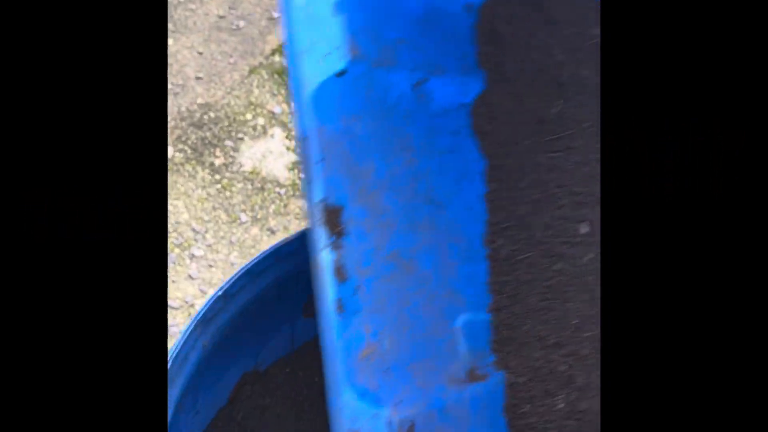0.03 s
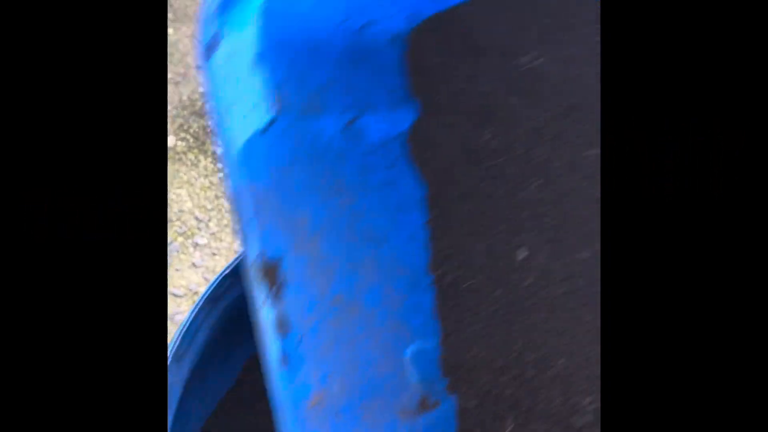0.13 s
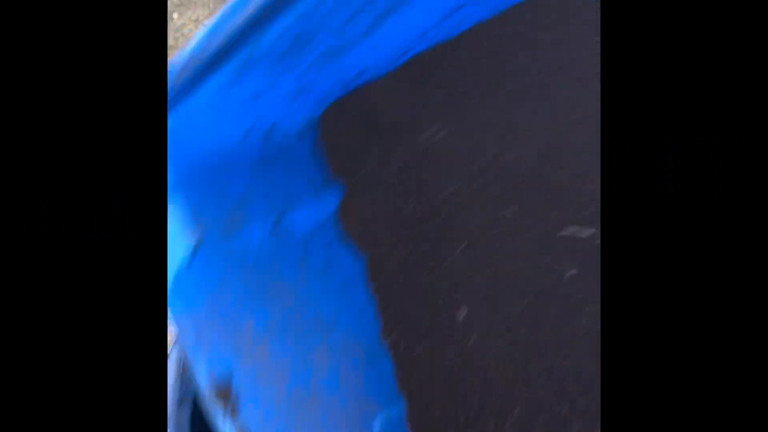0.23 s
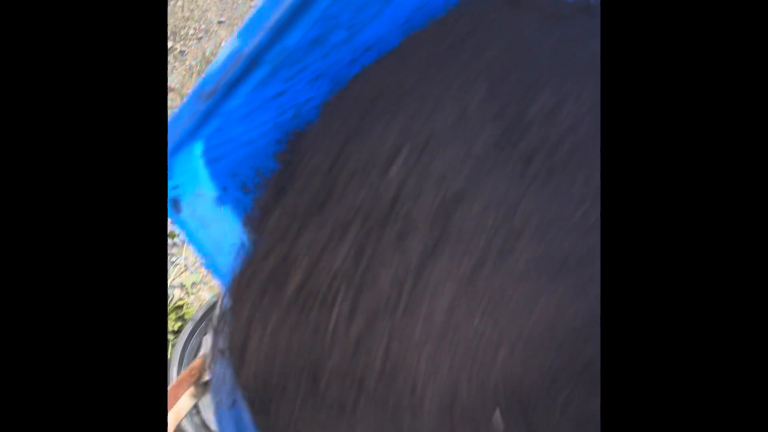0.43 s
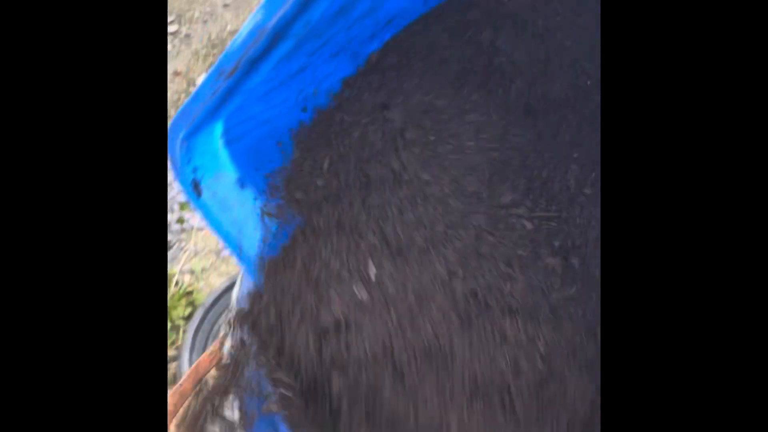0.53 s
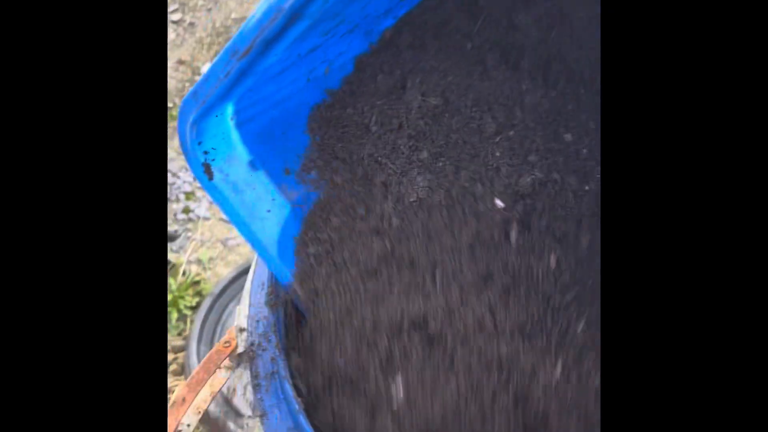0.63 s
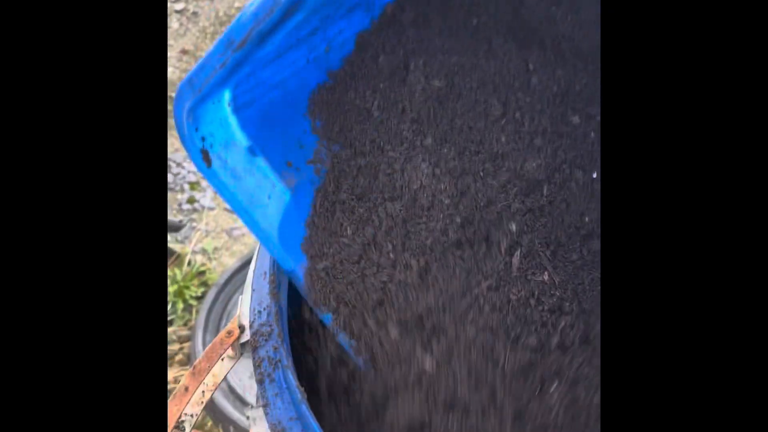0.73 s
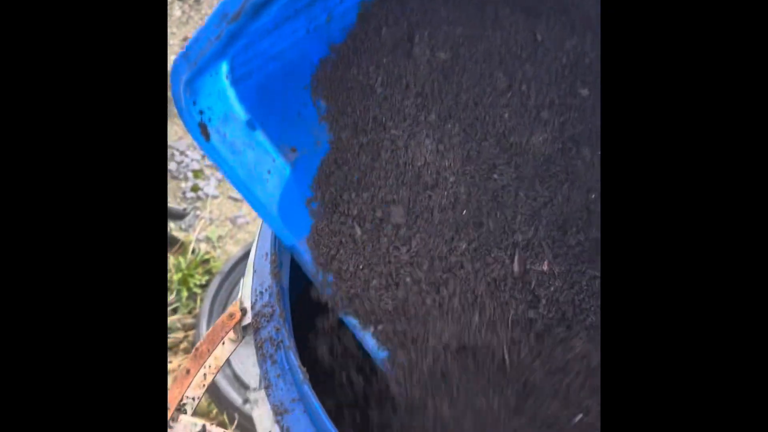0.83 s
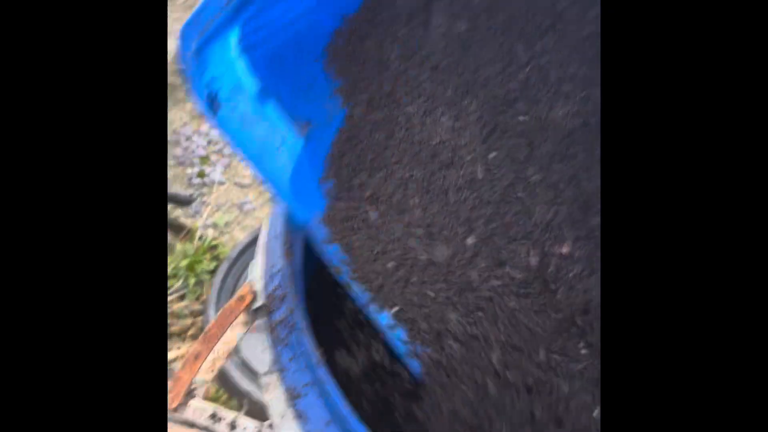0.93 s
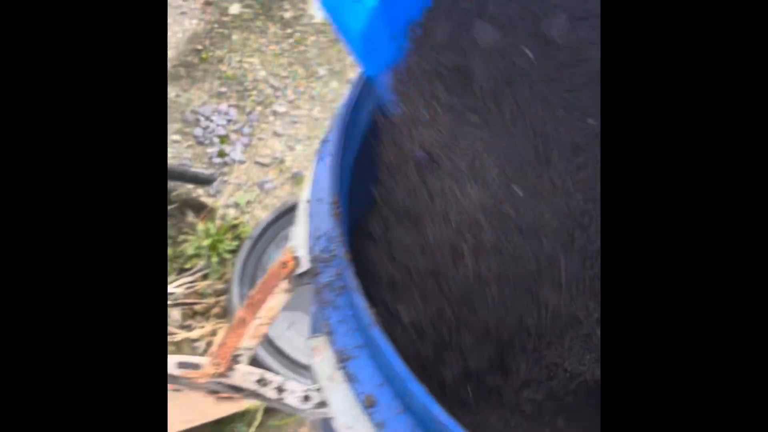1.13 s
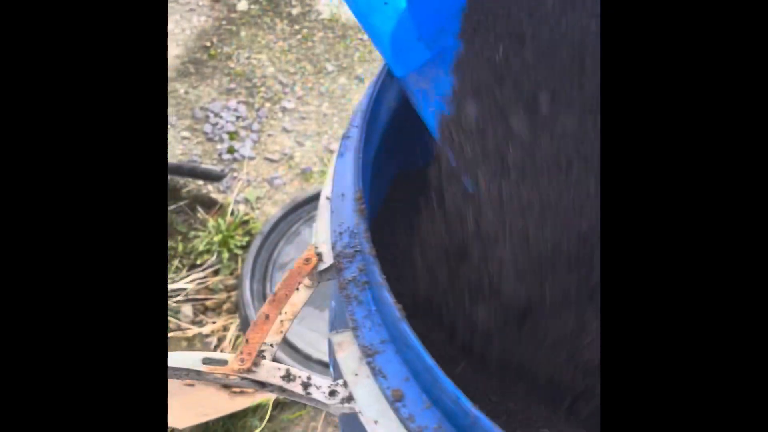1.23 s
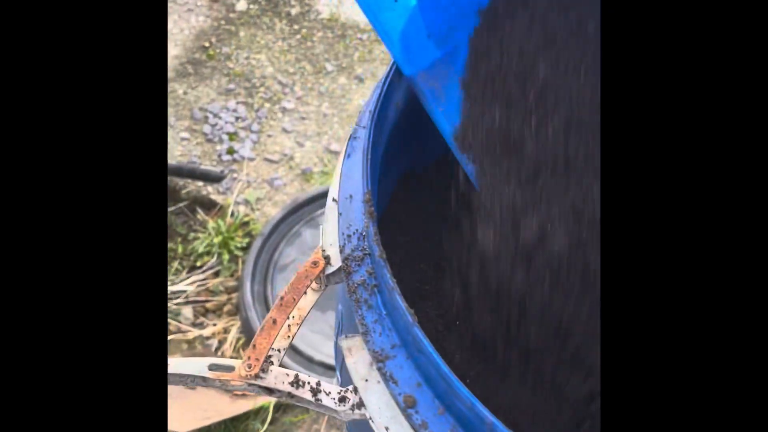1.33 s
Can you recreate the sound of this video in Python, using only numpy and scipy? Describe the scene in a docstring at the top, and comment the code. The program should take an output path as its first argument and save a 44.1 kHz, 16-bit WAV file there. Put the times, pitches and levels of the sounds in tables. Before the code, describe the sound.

Damp soil pours into a plastic barrel, close up outdoors. It starts with a soft sliding rustle. At about 0.25 seconds the plastic tub knocks loudly on the rim and a first load slumps in. Soil hisses over the edge around 0.6 seconds, with ticks of grit. From 0.9 seconds a second load lands with hollow thuds, thinning to trickling crumbs and a low rumble by 1.4 seconds.

```python
"""A plastic tub of damp soil is tipped over a plastic barrel, outdoors and close up.
First the soil creeps along the tub with a rustle of friction. At 0.24 s the tub knocks on the rim,
exciting its modes, and a first load slumps into the barrel, which booms at its resonances.
Soil then hisses over the lip, crumbs trickle, clods thud and bits of grit tick on the plastic.
At 0.93 s a second load booms, and the last clods and crumbs fall over the barrel's low murmur."""
import sys
import numpy as np
from scipy import signal
from scipy.fft import rfft, irfft, next_fast_len
from scipy.io import wavfile
from scipy.ndimage import map_coordinates

SR = 44100
rng = np.random.default_rng(int(sys.argv[2]) if len(sys.argv) > 2 else 0)


def master(y):
    """Save y as 16-bit WAV."""
    cut = np.clip(np.atleast_2d(y).T, -1, 1)
    pcm = np.round(cut * 32767)  # scale
    wavfile.write(sys.argv[1], SR, pcm.astype(np.int16))


N = 61739

# spectrum of crumbling soil: frequency_hz, density_db
CRUMBS = [(100, 13), (400, 7.5), (700, -9), (1000, -1), (1500, -4), (2400, -4), (3500, -13), (7000, -11.5),
          (9500, -14.5), (10700, -15.5), (11600, -51), (14000, -75)]
WALL_RISE_CYCLES = .88


def amp(db):
    """Amplitude ratio of a level in decibels."""
    return 10 ** (np.asarray(db) / 20)


def unit(x):
    """Normalisation to an rms of 1."""
    return x / np.sqrt(np.mean(x ** 2) + 1e-20)


def along(points, hz):
    """Interpolation of (frequency_hz, value) points on a logarithmic frequency axis."""
    frequencies, values = np.transpose(points)
    return np.interp(np.log(hz + 1), np.log(frequencies + 1), values)


def clock():
    """Time of each sample in seconds."""
    return np.arange(N) / SR


def envelope(rows):
    """Amplitude envelope through (time_s, level_db) points."""
    return amp(np.interp(clock(), *np.transpose(rows)))


def since(start_s):
    """Time elapsed since an onset, zero before it."""
    return np.maximum(clock() - start_s, 0)


def filtered(x, response):
    """Linear filtering: the spectrum of x is multiplied by a frequency response."""
    size = next_fast_len(N + SR // 2)
    return irfft(rfft(x, size) * response(np.fft.rfftfreq(size, 1 / SR)), size)[..., :N]


def coloured(x, spectrum):
    """Spectral shaping by (frequency_hz, gain_db) points, normalised to an rms of 1."""
    return unit(filtered(x, lambda hz: amp(along(spectrum, hz))))


def impacts(per_s, spread_db):
    """Shot noise: independent tiny impacts of uneven size, at an rms of 1."""
    strikes = rng.random(N) < per_s / SR
    size = amp(spread_db * np.clip(rng.standard_normal(N), -2.5, 2.5))
    polarity = rng.choice([-1, 1], N)
    return unit(strikes * polarity * size)


def clumps(per_s, depth_db):
    """Random amplitude modulation: a smoothly varying gain, as damp soil moves in clumps."""
    knots = rng.standard_normal(1024)
    return amp(depth_db * map_coordinates(knots, [clock() * per_s], mode="wrap"))


def ring(t, hz, t60_s, rise_cycles):
    """Free vibration of one mode: a sinusoid with a soft onset and exponential decay."""
    return np.sin(2 * np.pi * hz * t) * amp(-60 * t / t60_s) * (1 - np.exp(-t * hz / rise_cycles))


def knock():
    """Impact excites modes: the tub touches, hits and settles on the rim, with a snap and a crack."""
    # tub meeting the rim: start_s, thud_db, wall_db, focus_hz, crack_db, crack_t60_s, cutoff_hz
    contacts = [(.2394, -57.5, -21, 1920, -15.5, 0.0089, 5500),
                (0.2443, -6.5, -18.5, 960, -14.5, 0.079, 13900), (0.2586, -6, -28.5, 980, -44, 0.11, 5000)]
    # deep modes of the tub resting on the barrel: pitch_hz, level_db, t60_s, rise_cycles
    tub_modes = [(67.6, -10, 0.076, 0.58), (120, -1.5, 0.077, .9), (173, -3, 0.036, 0.82),
                 (283, 6, 0.053, 0.26), (500, -8, 0.04, .5), (534.6, -4.5, 0.035, 0.86),
                 (576, -6.5, 0.046, 0.71), (655, -20.5, 0.021, 0.44), (825, -17.5, 0.018, .4)]
    # modes of the thin tub wall: pitch_hz, level_db, t60_s
    wall_modes = [(805, 0, .05), (980, -8, .05), (1113, -4, .05), (1226, -4, .05), (1526, 0, .05),
                  (1733, -3, .055), (1858, -2, .055), (2355, -6, .04), (2695, -1, .05), (3965, -5, .04)]
    # spectrum of the gritty crack: frequency_hz, density_db
    crack_spectrum = [(200, -2), (700, 4.5), (1800, -3), (3300, -12.5), (3900, -5.5), (4500, -9.5),
                      (6000, -10), (8000, -9.5), (9500, -2.5), (11000, -17.5), (14000, -23)]
    focus_octaves = .9
    out = amp(-6) * ring(since(.2447), hz=7850, t60_s=.0084, rise_cycles=.98)  # the hard edge snaps
    for start_s, thud_db, wall_db, focus_hz, crack_db, crack_t60_s, cutoff_hz in contacts:
        t = since(start_s)
        for hz, db, t60_s, rise_cycles in tub_modes:
            out += amp(thud_db + db) * ring(t, hz, t60_s, rise_cycles)
        for hz, db, t60_s in wall_modes:
            coupling = 1 / (1 + (np.log2(hz / focus_hz) / focus_octaves) ** 2)
            strength = amp(wall_db + db + rng.normal(0, 1)) * rng.choice([-1, 1])
            out += coupling * strength * ring(t, hz, t60_s, WALL_RISE_CYCLES)
        grains = coloured(impacts(12000, spread_db=2.5), crack_spectrum)
        crack = amp(crack_db - 60 * t / crack_t60_s) * (t > 0) * grains
        out += filtered(crack, lambda hz: 1 / np.hypot(1, (hz / cutoff_hz) ** 2))
    return out


def thumps():
    """Mass loading: the soil's weight comes down on the tub floor, whose pitch sags as it rings."""
    # blows on the tub floor: start_s, level_db, start_hz, end_hz, t60_s, rise_cycles
    blows = [(0.2461, 12.5, 156, 137, 0.04, 2.23), (0.251, -5, 131, 72, 0.11, 0.69)]
    sag_s = .024
    out = np.zeros(N)
    for start_s, db, start_hz, end_hz, t60_s, rise_cycles in blows:
        t = since(start_s)
        cycles = end_hz * t + (start_hz - end_hz) * sag_s * (1 - np.exp(-t / sag_s))
        attack = 1 - np.exp(-cycles / rise_cycles)
        out += np.sin(2 * np.pi * cycles) * amp(db - 60 * t / t60_s) * attack
    return out


def loads():
    """Forced resonance: each load is a shower of lumps that drives the barrel and bursts into crumbs."""
    # loads landing in the barrel: start_s, rise_s, hold_s, release_s, boom_db, crumbs_db
    landings = [(0.241, 0.076, 0.082, 0.19, -28.5, -33.5), (0.928, 0.055, 0.1, 0.13, -22, -39.5)]
    # resonances of the barrel: centre_hz, bandwidth_hz, gain_db
    barrel_modes = [(73.6, 51, -5), (133.6, 29.3, -0.5), (165, 30, -2), (237.6, 24.6, 3), (299, 55, -1),
                    (383, 68, -8.5), (534, 124, -16)]
    rise_db, release_db, crumbs_lag_s = 16, 37, .0023

    def barrel(hz):
        """Modal superposition: band-pass resonances add with alternating sign."""
        return sum((-1) ** k * amp(db) * 1j * hz * width / (centre ** 2 - hz ** 2 + 1j * hz * width)
                   for k, (centre, width, db) in enumerate(barrel_modes))

    def flow(t, rise_s, hold_s, release_s):
        """The flow of soil grows exponentially, holds and decays."""
        growth_db = np.minimum(rise_db * (t / rise_s - 1), 0)
        decay_db = release_db * np.maximum(t - rise_s - hold_s, 0) / release_s
        return amp(growth_db - decay_db)

    out = np.zeros(N)
    for start_s, *stages_s, boom_db, crumbs_db in landings:
        t = clock() - start_s
        boom = unit(filtered(impacts(2000, spread_db=2), barrel))
        crumbs = coloured(impacts(8000, spread_db=12), CRUMBS) * clumps(120, depth_db=2)
        out += amp(boom_db) * boom * flow(t, *stages_s)
        out += amp(crumbs_db) * crumbs * flow(t - crumbs_lag_s, *stages_s)
    return out


def clods():
    """Inelastic impact: a clod thuds for a few cycles, drawn out a little by the barrel, and crumbles."""
    # clods landing on soil, and at 0.278 s the tub floor's late low thump: start_s, thud_db, pitch_hz,
    # crunch_db
    landings = [(0.121, -28, 284, -36), (0.186, -17, 87, -38), (0.212, -25.5, 587, -41),
                (0.2783, -9, 90, -32), (0.334, -11.5, 165, -41), (0.347, -17, 293, -40),
                (0.382, -13.5, 90, -41), (.384, -18.5, 255, -42), (0.608, -27, 336, -68),
                (0.616, -18, 107, -49.5), (0.669, -18.5, 100, -62), (0.685, -16.5, 66, -63),
                (0.754, -22.5, 130, -39), (.792, -25.5, 141, -62), (0.809, -12.5, 70.6, -63),
                (.915, -21, 255, -67), (0.962, -12, 148, -33), (.9825, -17, 270, -55),
                (.990, -11, 305, -50), (.994, -16, 550, -55), (1.0095, -5.5, 300, -28),
                (1.0195, -9.5, 265, -33), (1.053, -10.5, 124, -31), (1.085, -21, 270, -30.5),
                (1.124, -20, 228, -55), (1.162, -18.5, 125, -41.5), (1.296, -14, 81.6, -46),
                (1.364, -20.5, 61, -64)]
    decay_cycles, min_t60_s, crunch_t60_s = 6, .026, .098
    crumble = coloured(impacts(7000, spread_db=3), CRUMBS)
    out = np.zeros(N)
    for start_s, thud_db, hz, crunch_db in landings:
        t = since(start_s)
        t60_s = np.hypot(decay_cycles / hz, min_t60_s)
        out += amp(thud_db) * ring(t, hz, t60_s, rise_cycles=.45)
        out += amp(crunch_db - 60 * t / crunch_t60_s) * (t > 0) * crumble
    return out


def grit():
    """Brief contact gives a high band of noise: a small stone ticks and rings the plastic wall."""
    # grit striking plastic: start_s, level_db, pitch_hz, relative_width, wall_relative_db
    strikes = [(.3035, -37, 7500, .3, -18), (.3645, -33, 7000, .3, -25), (0.3901, -30, 4930, .3, -19),
               (0.4778, -33, 7500, .4, -5.5), (.5825, -21.5, 6600, .42, -3), (.8972, -36, 9400, .3, -45),
               (.9135, -28, 6700, .1, -38)]
    tick_t60_s = .0043
    out = np.zeros(N)
    for start_s, db, pitch_hz, width, wall_db in strikes:
        t = since(start_s)
        band = lambda hz: 1 / (1 + (np.log((hz + 1) / pitch_hz) / width) ** 2)
        noise = unit(filtered(rng.standard_normal(N), band))
        tick = noise * (t > 0) * amp(-60 * t / tick_t60_s)
        wall = ring(t, hz=1100, t60_s=.03, rise_cycles=WALL_RISE_CYCLES)
        out += amp(db) * (tick + amp(wall_db) * wall)
    return out


def creep():
    """Granular friction: fine grains rub along the tub floor, and their tiny contacts merge as noise."""
    # course of the sliding: time_s, level_db
    levels = [(0, -41.5), (.03, -38.5), (.08, -37), (.125, -34), (.16, -39), (.2, -37), (.235, -46.5),
              (.3, -41), (.46, -43), (.62, -54), (1.4, -61)]
    # spectrum of the rubbing: frequency_hz, density_db
    spectrum = [(60, -0.5), (170, 8.5), (280, -0.5), (420, -5.5), (650, -4), (1000, -12), (1500, -18),
                (2400, -13), (3500, -21.5), (4300, -16), (5500, -12), (7000, -20), (9700, -8.5),
                (11000, -26), (14000, -96)]
    grains = coloured(impacts(9000, spread_db=1.5), spectrum)
    return envelope(levels) * grains * clumps(68.1, depth_db=2.5)


def lip_hiss():
    """Granular flow: soil runs over the tub's lip in clumps, its dense collisions heard as a hiss."""
    # course of the pouring: time_s, level_db
    levels = [(0, -78), (.3, -46.5), (.44, -46.5), (.48, -43.5), (.51, -46), (.545, -36), (.588, -33.5),
              (.63, -47), (.75, -69), (.8, -48.5), (1.4, -80)]
    # spectrum of the hiss: frequency_hz, density_db
    spectrum = [(300, -15), (750, -6), (920, 3), (1040, 6.5), (1180, -2.5), (1400, -6), (2400, -9),
                (3500, -19.5), (5000, -13), (7000, -11), (9500, 2.5), (11000, -8), (14000, -32)]
    grains = coloured(impacts(7000, spread_db=2.5), spectrum)
    return envelope(levels) * grains * clumps(79.7, depth_db=3.5)


def trickle():
    """Shot noise: a thin, continuous fall of crumbs lands at random instants."""
    # course of the fall: time_s, level_db
    levels = [(0, -45.5), (.6, -44.5), (.75, -43), (.8, -51), (.88, -53), (.94, -38.5), (1.14, -45),
              (1.25, -45), (1.4, -42.5)]
    # spectrum of the landing crumbs: frequency_hz, density_db
    spectrum = [(100, 7.5), (200, 13.5), (300, 7.5), (420, 2.5), (650, -1.5), (900, -0.5), (1500, -5),
                (2400, -5.5), (3500, -10.5), (7000, -12), (9500, -8), (10600, -15), (11800, -57),
                (14000, -60)]
    grains = coloured(impacts(7000, spread_db=3), spectrum)
    return envelope(levels) * grains * clumps(60.56, depth_db=1.1)


def murmur():
    """Random excitation: the barrel murmurs with low-frequency noise that swells and ebbs."""
    # course of the murmur: time_s, level_db
    levels = [(0, -41), (.07, -33.5), (.2, -41), (.32, -31), (.42, -32), (.48, -39), (.6, -42.5),
              (.75, -31.5), (.89, -40.5), (.96, -31), (1.12, -26.5), (1.25, -45), (1.4, -34)]
    # spectrum of the murmur: frequency_hz, density_db
    spectrum = [(15, -11), (30, -6), (48, 6), (80, -4), (130, -12.5), (200, -12.5), (400, -80)]
    return envelope(levels) * coloured(rng.standard_normal(N), spectrum)


def yard(x):
    """Diffuse scattering: the ground and nearby things return a short, weak tail to each channel."""
    # strength of the scatter: frequency_hz, gain_db
    scatter = [(100, -24), (300, -20), (600, -13), (1500, -12), (2700, -7), (4000, -14), (9000, -19)]
    t60_s = .09
    t = np.arange(SR // 8) / SR
    tail = rng.standard_normal((2, len(t))) * amp(-60 * t / t60_s)
    wet = signal.fftconvolve(x[None], tail / np.linalg.norm(tail[0]), axes=1)[:, :N]
    return filtered(wet, lambda hz: amp(along(scatter, hz)))


def scene():
    """Superposition: all sounds leave one spot and reach two microphones at differing phase and level."""
    # phase by which left leads right: frequency_hz, lead_rad
    phase = [(20, 0), (300, -.12), (750, -.4), (1100, -.2), (1600, 0), (2700, .8), (3900, .8), (4500, 1.6),
             (5000, 3.9), (5450, 5.6), (5900, 6.25), (6400, 6.6), (7400, 7.8), (8350, 8.9), (9250, 9.42),
             (10000, 10), (10800, 10.9), (11800, 12.4)]
    # level of left over right: frequency_hz, balance_db
    balance = [(60, -.4), (400, -2), (680, -1.5), (950, -6.5), (1700, 0), (2700, 2.5), (3500, 0),
               (4600, -3.5), (5400, 0.7), (6500, 0)]
    sound = knock() + thumps() + loads() + creep() + lip_hiss() + trickle() + clods() + grit() + murmur()
    left = lambda hz: amp(along(balance, hz) / 2) * np.exp(.5j * along(phase, hz))
    direct = filtered(sound, lambda hz: np.array([left(hz), 1 / left(hz)]))
    return direct + yard(sound)


def record(dry):
    """Band limiting and saturation: the recorder cuts sub-bass, rounds high peaks and dulls the top."""
    # treble roll-off of the microphone: frequency_hz, gain_db
    treble = [(10500, 0), (11500, -3), (12400, -8), (13200, -21), (14600, -34)]
    low_cut_hz, top_hz, ceiling = 26, 14600, .93
    high_passed = filtered(dry, lambda hz: 1 - 1 / (1 + (hz / low_cut_hz) ** 4))
    saturated = high_passed / (1 + np.abs(high_passed / ceiling) ** 6) ** (1 / 6)
    return filtered(saturated, lambda hz: amp(along(treble, hz)) * (hz < top_hz))


dry = scene()
out = record(dry)
master(out)
```